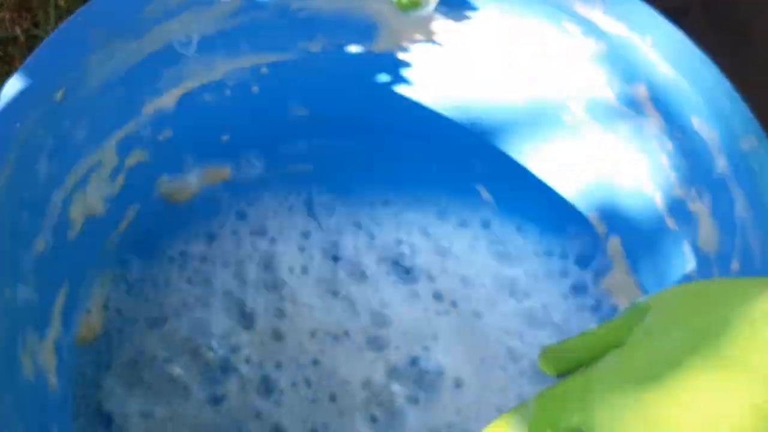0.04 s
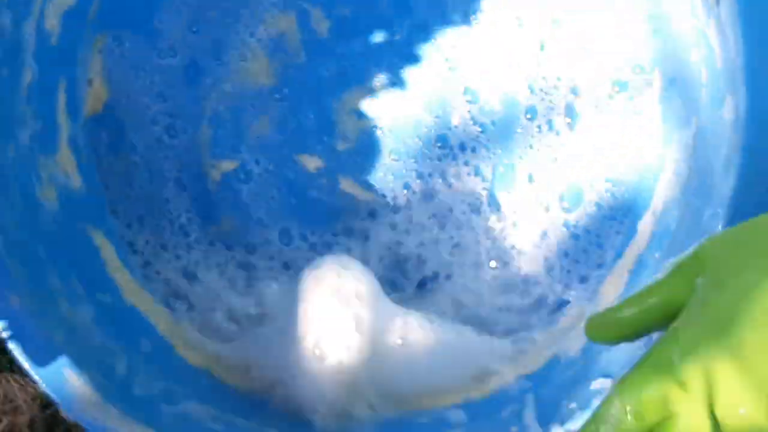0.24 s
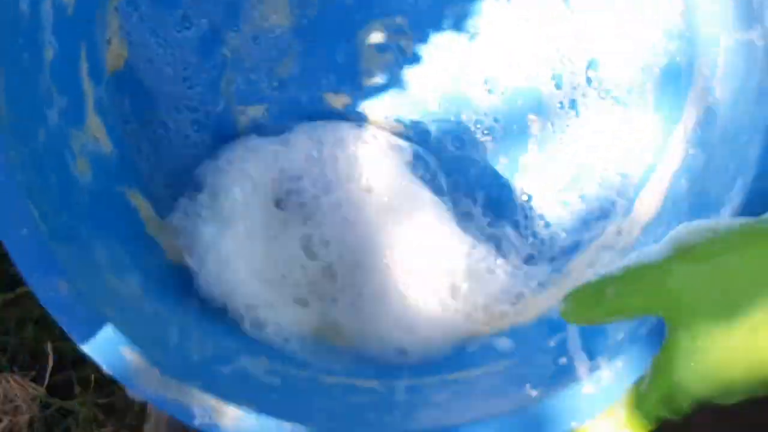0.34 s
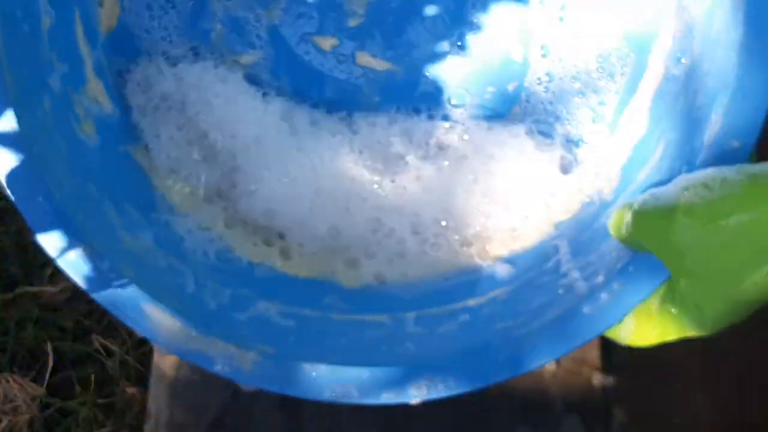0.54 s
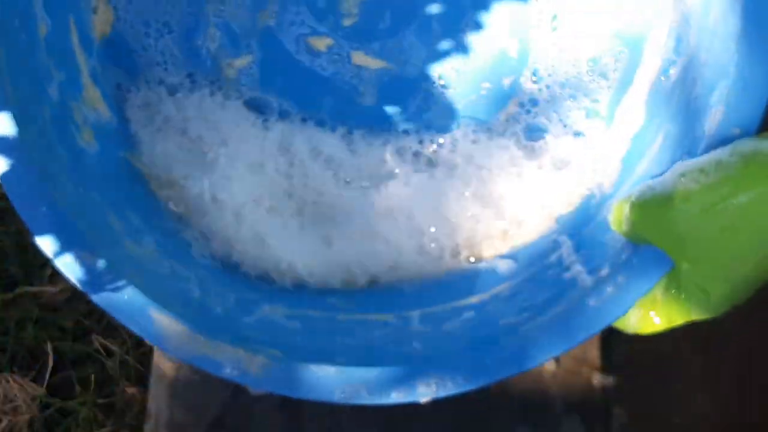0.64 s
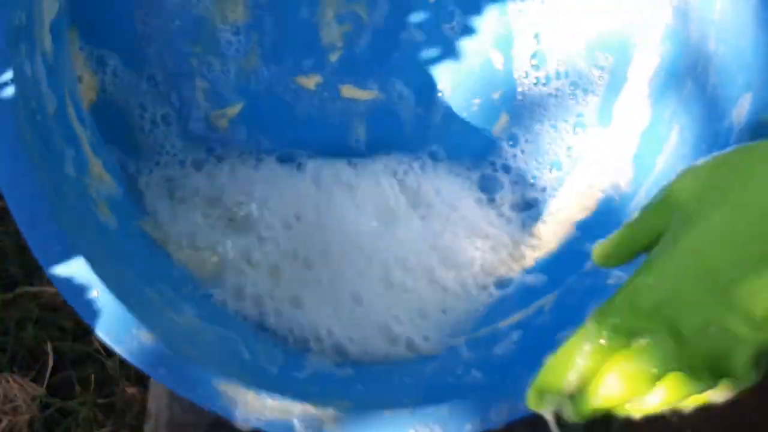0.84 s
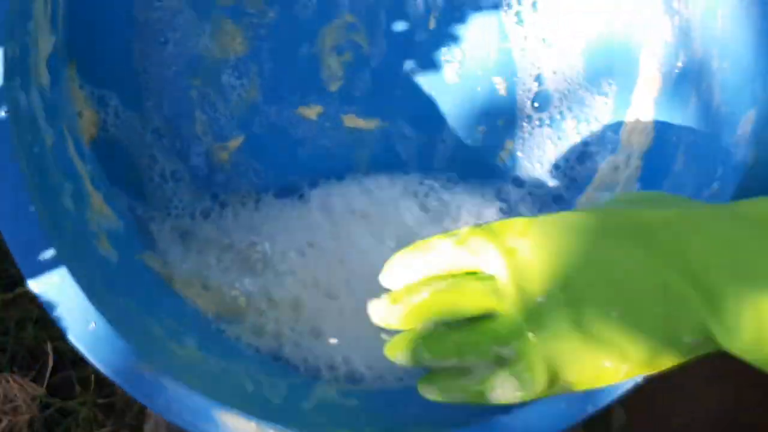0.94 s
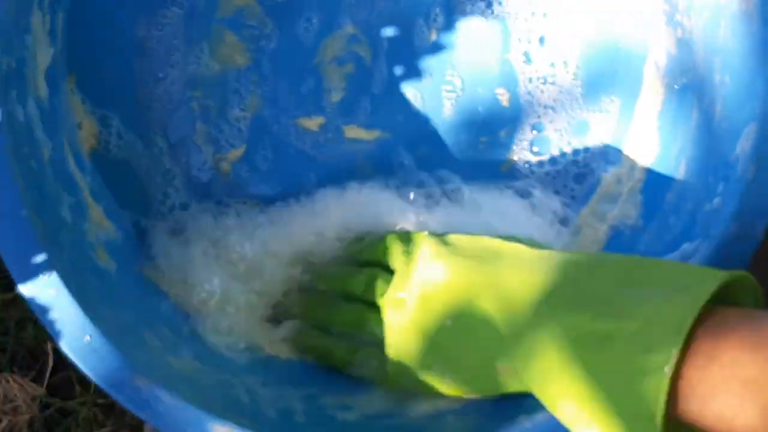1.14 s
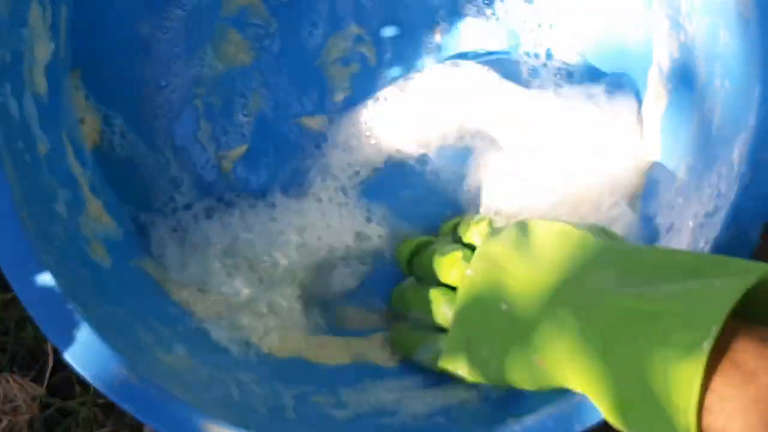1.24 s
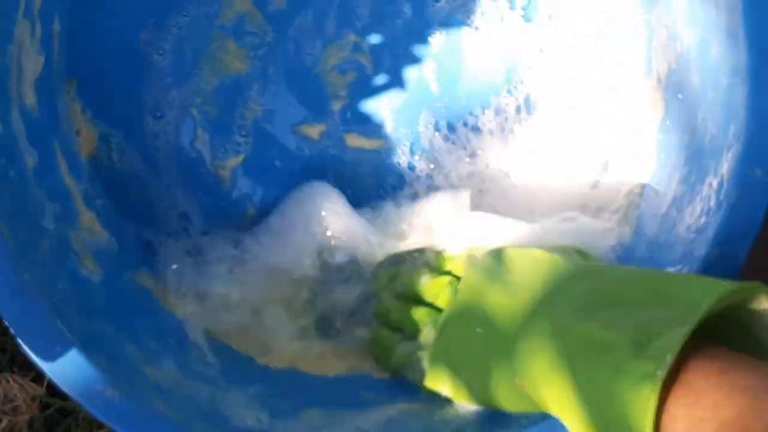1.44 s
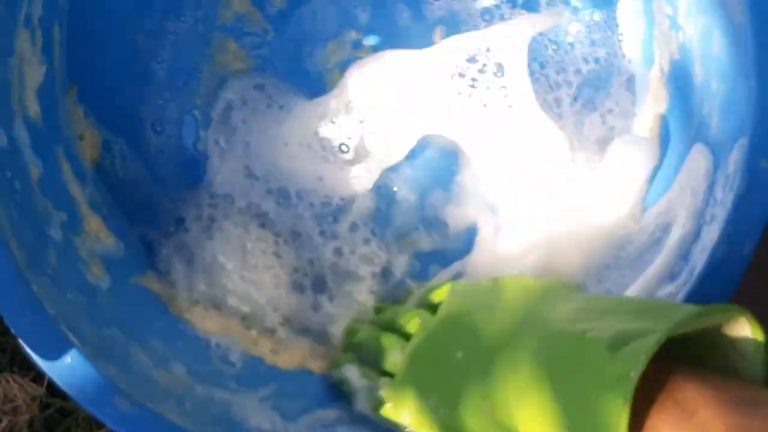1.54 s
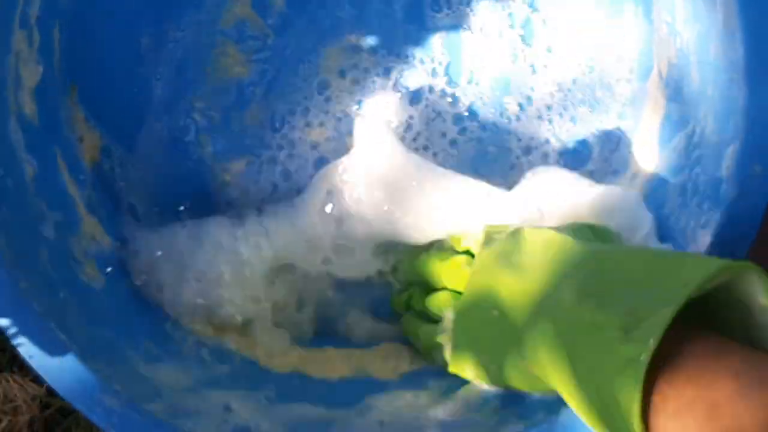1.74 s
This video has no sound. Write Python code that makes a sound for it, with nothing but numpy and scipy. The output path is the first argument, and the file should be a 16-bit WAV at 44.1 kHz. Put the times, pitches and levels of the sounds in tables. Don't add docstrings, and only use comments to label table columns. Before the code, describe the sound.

Two hollow plastic tub knocks with rattling water, a short gritty drag, then soft foamy splashing and bubble pops

```python
import sys
import numpy as np
from scipy import signal
from scipy.fft import rfft, irfft, next_fast_len
from scipy.io import wavfile
from scipy.ndimage import map_coordinates

SR = 44100
rng = np.random.default_rng(int(sys.argv[2]) if len(sys.argv) > 2 else 0)


def decibels_to_gain(level_db):
    exponent = np.asarray(level_db, float) / 20
    return 10 ** exponent


def wav_out(sig):
    wavfile.write(sys.argv[1], SR, np.round(np.clip(np.atleast_2d(sig).T, -1, 1) * 32767).astype(np.int16))


N = 79380
T = np.arange(N) / SR


def unit(x):
    return x / np.sqrt(np.mean(x ** 2) + 1e-20)


def along(points, hz):
    point_hz, value = np.transpose(points)
    return np.interp(np.log(hz + 1), np.log(point_hz + 1), value)


def curves(rows):
    time_s, *columns = np.transpose(rows)
    return [np.interp(T, time_s, column) for column in columns]


def gate(rows, fade_s):
    fade_in = np.clip((T - rows[0][0]) / fade_s + 1, 0, 1)
    fade_out = np.clip((rows[-1][0] - T) / fade_s + 1, 0, 1)
    return fade_in * fade_out


def wobble(rate_hz):
    return map_coordinates(rng.standard_normal(4000), [T * rate_hz])


def filtered(x, response):
    size = next_fast_len(N + SR // 2)
    return irfft(rfft(x, size) * response(np.fft.rfftfreq(size, 1 / SR)), size)[..., :N]


def shaped(spectrum):
    return lambda hz: decibels_to_gain(along(spectrum, hz))


def resonant(peaks):
    def response(hz):
        total = 0
        for k, (centre_hz, width_hz, level_db) in enumerate(peaks):
            damping = 1j * hz * width_hz
            total = total + (-1) ** k * decibels_to_gain(level_db) * damping / (centre_hz ** 2 - hz ** 2 + damping)
        return total
    return response


# pitch_hz, left_right_likeness [0..1]
LIKENESS = [(100, 0.98), (400, 0.83), (800, 0.54), (3000, 0.24), (10000, 0.1)]


def rush(colour, grain_db):
    pair = rng.standard_normal((2, N)) * decibels_to_gain(grain_db * wobble(700))

    def mid_side(hz):
        angle = np.arccos(np.clip(along(LIKENESS, hz), -1, 1)) / 2
        return colour(hz) * [np.cos(angle), np.sin(angle)]

    mid, side = filtered(pair, mid_side)
    return unit(np.array([mid + side, mid - side]))


# pitch_hz, level_db, t60_s
WALL_FIRST = [(163, -12.5, 0.21), (243.4, 5, 0.046), (356.2, 2.5, 0.11), (527, -16, 0.036),
              (762, -15, 0.073), (887, -24, 0.045), (1037, -20, 0.038), (1234, -10, 0.026),
              (1310, -15.5, 0.049), (1700, -34, 0.023)]
WALL_SECOND = [(75.5, -13.5, 0.18), (190.7, -3.5, 0.076), (245, 0.5, 0.049), (352.5, -4.5, 0.069),
               (403, -7, 0.05), (549, -16.5, 0.053), (748, -11.5, 0.04), (1192, -11.5, 0.019),
               (1334, -15.5, 0.017), (1587, -29.5, 0.027)]
# start_s, level_db, tilt_db_per_octave
CONTACTS_FIRST = [
    (0.2145, -16.5, -1),
    (0.255, -43.5, 6),
    (.275, -36.5, -4),
    (.29, -38, -1.5),
    (.347, -43.5, -0.5),
]
CONTACTS_SECOND = [
    (0.481, -13.5, 0.2),
    (.505, -29.5, 0.77),
    (.518, -38.5, 3),
    (.527, -32, -1),
    (.549, -31.5, -4),
    (.563, -37.5, -0.5),
    (0.579, -43, -1.5),
    (0.618, -45.5, -2.5),
]


def knocks():
    out, t = np.zeros(N + SR), T[:SR // 2]
    for wall, contacts in ((WALL_FIRST, CONTACTS_FIRST), (WALL_SECOND, CONTACTS_SECOND)):
        for k, (start_s, level_db, tilt_db) in enumerate(contacts):
            rebound = k > 0
            rise_cycles = 1.56 if rebound else 0.49
            ring = 0
            for hz, mode_db, t60_s in wall:
                stray, phase = rng.standard_normal(2) * rebound
                fall = decibels_to_gain(mode_db + tilt_db * np.log2(hz / 300) + 1.5 * stray - 60 * t / t60_s)
                ring = ring + fall * np.sin(2 * np.pi * hz * t + phase) * (1 - np.exp(-t * hz / rise_cycles))
            out[round(start_s * SR):][:len(t)] += decibels_to_gain(level_db) * np.sqrt(2) * ring
    return out[:N]


# start_s, level_db, rise_s, t60_s
SHAKES = [
    (0.214, -31.5, 0.0022, 0.2),
    (0.479, -37, 0.00058, 0.23),
]
# pitch_hz, level_db_per_hz
SHAKE_FIRST = [(300, -11), (550, -6), (1300, -7), (2100, -23), (6600, -27), (8000, -34.5), (16000, -39)]
SHAKE_SECOND = [(300, -10.5), (550, -3.5), (1400, -12.5), (2000, -24), (6500, -39), (15500, -48.5)]
MIST = [(12500, -17), (14500, 3)]


def shaken():
    late_db, late_longer = -17, 2.96
    mist_db, mist_t60_s = -60, 0.45
    out = 0
    for (start_s, level_db, rise_s, t60_s), tone in zip(SHAKES, (SHAKE_FIRST, SHAKE_SECOND)):
        t = np.maximum(T - start_s, 0)
        fall = decibels_to_gain(-60 * t / t60_s) + decibels_to_gain(late_db - 60 * t / t60_s / late_longer)
        out = out + decibels_to_gain(level_db) * fall * (1 - np.exp(-t / rise_s)) * rush(shaped(tone), grain_db=2.5)
    mist = decibels_to_gain(mist_db - 60 * t / mist_t60_s) * (1 - np.exp(-100 * t))
    return out + mist * rush(shaped(MIST), grain_db=2)


# start_s, pressure_db, grit_share_db
DRAG = [
    (.795, -62.5, -4),
    (.83, -50, -3),
    (.87, -40.5, -1.5),
    (.905, -38.5, -12.5),
    (.945, -47.5, -5.5),
    (1.0, -45, -8),
    (1.035, -46, -7.5),
    (1.07, -56.5, -17),
    (1.11, -60, -6),
]
# pitch_hz, width_hz, level_db
DRAG_WALL = [(79, 17, -8.5), (171.6, 11.2, -6.5), (306, 65, -4), (550, 73, -18.5)]
DRAG_GRIT = [(590, 79, 6), (854, 210, 1.5), (1184, 230, 1), (1803, 170, -7)]
# pitch_hz, level_db_per_hz
DRAG_HISS = [(1500, -31), (2200, -6), (6500, -6.5), (8000, -10), (12000, -21.5)]


def drag():
    hiss_db, hiss_s, hiss_width_s = -63.5, 0.939, 0.1
    dull_hz = 2230
    pressure_db, grit_db = curves(DRAG)

    def dull(peaks):
        return lambda hz: resonant(peaks)(hz) / (1 + (hz / dull_hz) ** 6)

    swell = np.exp(-((T - hiss_s) / hiss_width_s) ** 2)
    hiss = decibels_to_gain(hiss_db) * swell * rush(shaped(DRAG_HISS), grain_db=0.5)
    body = decibels_to_gain(-2) * rush(dull(DRAG_WALL), grain_db=2.5)
    grit = decibels_to_gain(grit_db) * rush(dull(DRAG_GRIT), grain_db=3.5)
    return gate(DRAG, fade_s=0.013) * decibels_to_gain(pressure_db) * (body + grit) + hiss


# start_s, level_db, pitch_hz, t60_s
SLIPS = [(.84, -37, 258, 0.081), (.852, -37, 255, 0.041), (.872, -34, 269, 0.077), (0.893, -28.5, 282, .1),
         (0.924, -36, 290, 0.035), (.954, -35.5, 330, 0.079), (.976, -35, 284, 0.093),
         (.994, -35, 291, 0.11), (1.019, -38, 326, 0.083), (1.031, -39, 338, 0.055), (1.056, -43, 316, .08)]


def slips():
    rise_cycles, upper_ratio, upper_db = 1.1, 1.8, -15.5
    out, t = np.zeros(N + SR), T[:SR // 4]
    for start_s, level_db, hz, t60_s in SLIPS:
        phase = 2 * np.pi * hz * t
        ring = np.sin(phase) + decibels_to_gain(upper_db + rng.normal(0, 3.4)) * np.sin(upper_ratio * phase)
        rise = 1 - np.exp(-t * hz / rise_cycles)
        out[round(start_s * SR):][:len(t)] += decibels_to_gain(level_db - 60 * t / t60_s) * rise * ring
    return out[:N]


# start_s, level_db, spray_share_db
SLOP = [
    (0, -60, -15),
    (.05, -66.5, -12.5),
    (.085, -52.5, -18.5),
    (.105, -47.5, -7.5),
    (.13, -59.5, -2),
    (.17, -66.5, -3.5),
    (.205, -63, -7.5),
]
# pitch_hz, level_db_per_hz
SLOP_TONE = [(80, -36), (150, -10), (600, -3), (1500, -3), (1850, -8), (2100, -38)]
SPRAY = [(1500, -42.5), (2200, 2), (6700, -2.5), (8000, -7), (13000, -28)]


def slop():
    level_db, spray_db = curves(SLOP)
    lap = rush(shaped(SLOP_TONE), grain_db=3.5)
    spray = decibels_to_gain(spray_db) * rush(shaped(SPRAY), grain_db=2.5)
    return gate(SLOP, fade_s=0.072) * decibels_to_gain(level_db) * (lap + spray)


# start_s, effort_db, fine_foam_share_db, water_share_db
STIR = [(1.154, -74, -19, 0), (1.167, -72, 1, 15), (1.25, -62, -2.5, -2.5), (1.3, -65, 2, 0),
        (1.335, -58.5, 5.5, 3.5), (1.37, -60, -0.5, 7.5), (1.41, -58.5, -1, -1), (1.44, -54.5, -7, 0),
        (1.475, -52.5, -6.5, -4.5), (1.495, -53, 5.5, 1.5), (1.52, -59.5, 1.5, -5.5),
        (1.535, -52, 9.5, -16.5), (1.575, -48, -0.5, -16), (1.6, -47.5, -2.5, -3.5), (1.64, -60, -1, 5),
        (1.7, -63.5, -11.5, 3.5), (1.75, -57, -9.5, 2.5), (1.8, -63, -5, -0.5)]
# pitch_hz, level_db_per_hz
FIZZ = [(1200, -17), (2400, -11.5), (4800, -10), (6700, -17.5), (7600, -16), (10000, -48.5)]
FINE = [(5000, -19.5), (7500, -2), (13500, -9.5), (16000, -12)]
WATER = [(50, -22), (90, -4), (250, -5), (600, -6), (1100, -4.5), (1900, -10.5), (3000, -26.5)]
# pitch_hz, width_hz, level_db
BOWL = [(367, 56, 0)]


def stir():
    effort_db, fine_db, water_db = curves(STIR)
    pulse_db = 1.1 * wobble(72.9)
    fizz = decibels_to_gain(effort_db + pulse_db) * rush(shaped(FIZZ), grain_db=2.0)
    fine = decibels_to_gain(effort_db + fine_db + pulse_db) * rush(shaped(FINE), grain_db=2.0)
    bowl = decibels_to_gain(-3.5) * rush(resonant(BOWL), grain_db=1)
    water = decibels_to_gain(effort_db + water_db) * (rush(shaped(WATER), grain_db=3.5) + bowl)
    return gate(STIR, fade_s=0.11) * (fizz + fine + water)


# start_s, level_db, rise_s, t60_s
SPLASHES = [(1.162, -59, .002, 0.08), (1.287, -57, 0.0011, .015), (1.303, -52, 0.0029, .05),
            (1.331, -51, .003, .06), (1.421, -43.5, 0.0017, .07), (1.445, -44, .004, .07),
            (1.52, -53, .001, .03), (1.561, -50, .001, .03), (1.639, -48, .001, 0.017),
            (1.662, -43, .002, 0.05), (1.708, -49, .002, 0.044), (1.732, -47.5, 0.0034, 0.087),
            (1.748, -50, .003, 0.084)]
# pitch_hz, level_db_per_hz
SPLASH_TONE = [(300, -14), (700, 0.5), (1600, -0.5), (2300, -12), (6500, -12), (8000, -30)]


def splashes():
    level = 0
    for start_s, level_db, rise_s, t60_s in SPLASHES:
        t = np.maximum(T - start_s, 0)
        level = level + decibels_to_gain(level_db - 60 * t / t60_s) * (1 - np.exp(-t / rise_s))
    return level * rush(shaped(SPLASH_TONE), grain_db=3.5)


# start_s, peak_db, pitch_hz, life_ms
POPS = [(1.1945, -44.5, 4970, 0.36), (1.2155, -45, 4100, 0.61), (1.2485, -41, 6170, 1),
        (1.2665, -45.5, 4000, 0.98), (1.279, -39, 6750, 0.3), (1.3152, -36, 6350, 0.47),
        (1.3297, -29.5, 15100, 0.82), (1.339, -47, 5100, .4), (1.349, -43, 7000, 0.44),
        (1.4315, -29, 6600, 0.53), (1.4967, -28.5, 15700, 0.61), (1.533, -43.5, 6500, 0.4),
        (1.5889, -22.5, 6750, 0.16)]
# start_s, peak_db, pitch_hz, life_cycles
GLUGS = [(.041, -50.5, 166, 1.6), (.0845, -47, 1470, 6.5), (.101, -48, 1710, 8.5), (.1025, -40.5, 778, 4.6),
         (.121, -52.5, 147, 9.5), (.802, -49, 755, 5.5), (.825, -45.5, 805, 5.5), (1.367, -45.5, 192, 3.2),
         (1.4245, -44.5, 1430, 3.8), (1.477, -47, 395, 3.1), (1.4825, -45.5, 1985, 7.5),
         (1.5355, -40, 180, 1.7), (1.5914, -27.5, 1610, 1.15), (1.604, -40, 672, 4.2),
         (1.6135, -42, 605, 3.1), (1.6635, -45, 738, 2.9)]


def bubbles():
    spit_db, spit_s = -7, 0.0014
    out, t = np.zeros((2, N + SR)), T[:SR // 10]
    pops = [(start_s, peak_db, hz, life_ms * hz / 1000) for start_s, peak_db, hz, life_ms in POPS]
    for start_s, peak_db, hz, cycles in pops + list(GLUGS):
        age = t * hz / max(cycles, 0.5)
        rising = 1 + 0.0082 * np.minimum(age, 3)
        tone = np.exp(-age) * (1 - np.exp(-8 * age)) * np.sin(2 * np.pi * hz * t * rising)
        spit = decibels_to_gain(spit_db) * t / spit_s * np.exp(-t / spit_s) * rng.standard_normal((2, len(t)))
        burst = tone + spit * min(hz / 4000, 1)
        out[:, round(start_s * SR):][:, :len(t)] += decibels_to_gain(peak_db) * burst
    return out[:, :N]


# pitch_hz, t60_s
YARD = [(300, 0.29), (10000, 0.043)]


def yard(x):
    noise = [[0.93, 0.56], [0.52, 1]] @ rng.standard_normal((2, SR // 2))
    hz, t, z = signal.stft(noise, SR, nperseg=256)
    fall = decibels_to_gain(-60 * t / along(YARD, hz)[:, None])
    tail = signal.istft(z * fall, SR, nperseg=256)[1]
    tail = tail / np.linalg.norm(tail[0])
    return signal.fftconvolve(np.pad(x, (300, 0))[None], tail, axes=1)[:, :N]


# pitch_hz, level_db_per_hz
AIR = [(30, -11), (70, 0), (300, -9), (900, -20.5), (2000, -43), (3500, -45.5), (8000, -37), (15500, -38)]


def air():
    return decibels_to_gain(-58.5) * rush(shaped(AIR), grain_db=1.5)


# pitch_hz, left_over_right_db
LEAN = [(60, 1), (300, 2), (1300, 4), (4000, 3.5), (15000, 4)]


def scene():
    hits, pops = knocks(), bubbles()
    near = hits + shaken() + drag() + slips() + slop() + stir() + splashes() + pops
    near = near + decibels_to_gain(-17) * yard(hits) + decibels_to_gain(-8.5) * yard(pops[0])
    side = np.array([[0.5], [-0.5]])

    def lean(hz):
        return decibels_to_gain(along(LEAN, hz) * side) * np.exp(2j * np.pi * hz * side / SR)

    return air() + filtered(near, lean)


def top_cut(x):
    return signal.sosfilt(signal.butter(12, 17000, fs=SR, output="sos"), x)


# pitch_hz, level_db
MIC = [(5600, 2.5), (6700, 4.5), (7300, -6.5), (13500, -2), (15500, 2)]


def record(dry):
    rumble_cut_hz, top_hz = 60, 15950

    def microphone(hz):
        rumble_cut = (1j * hz / (rumble_cut_hz + 1j * hz)) ** 3
        return shaped(MIC)(hz) * rumble_cut * (hz < top_hz)

    mix = filtered(dry, microphone)
    return top_cut(mix)


dry = scene()
out = record(dry)
wav_out(out)
```